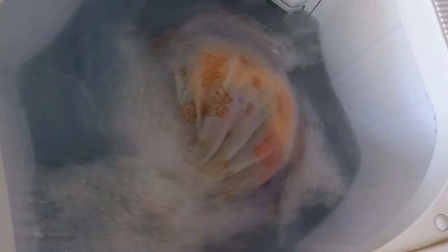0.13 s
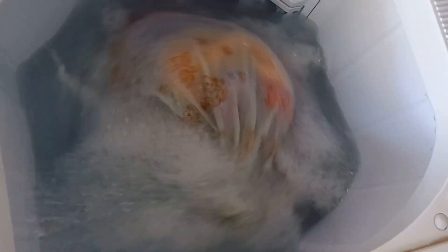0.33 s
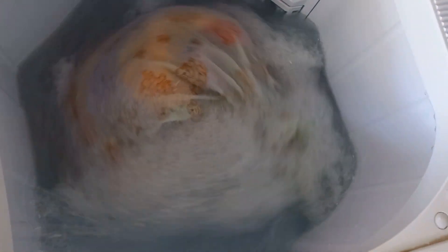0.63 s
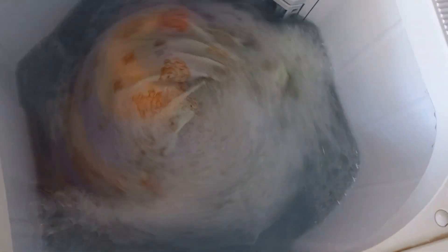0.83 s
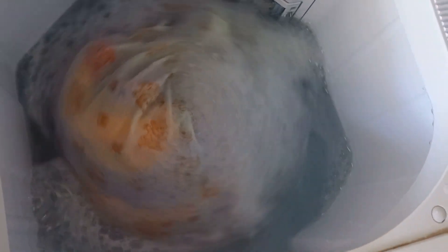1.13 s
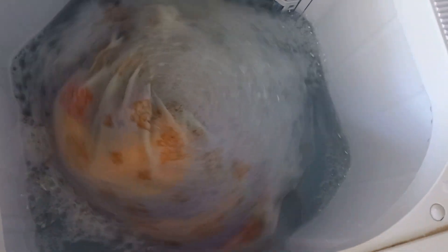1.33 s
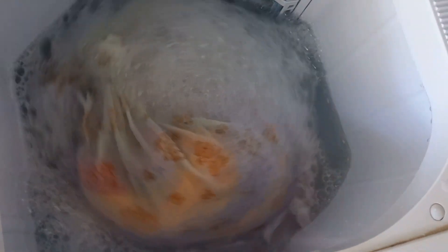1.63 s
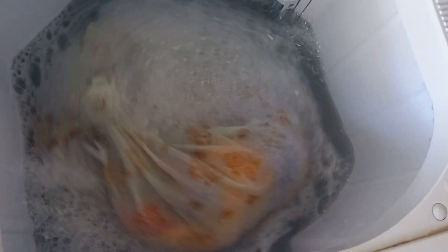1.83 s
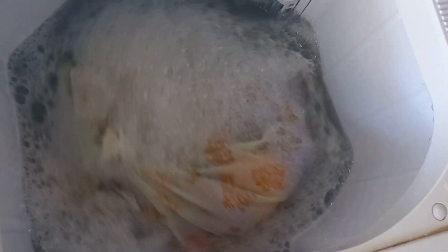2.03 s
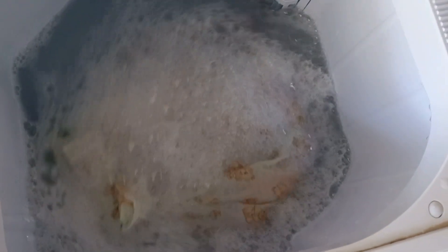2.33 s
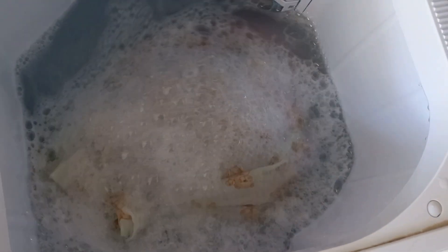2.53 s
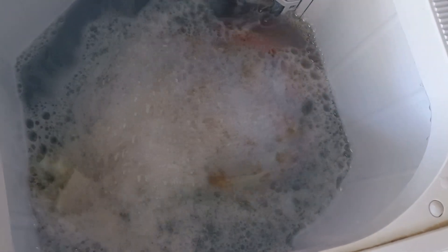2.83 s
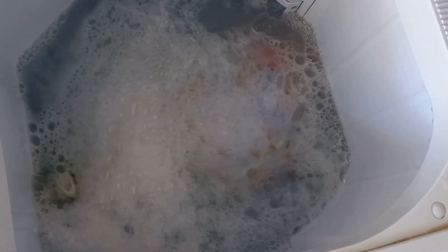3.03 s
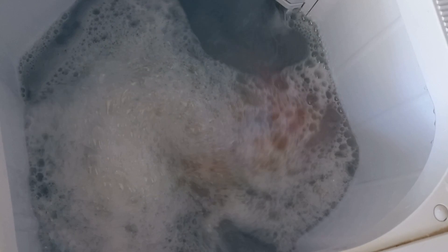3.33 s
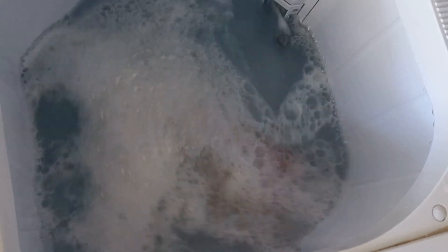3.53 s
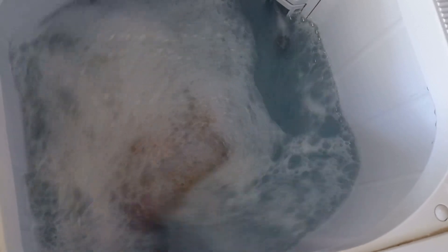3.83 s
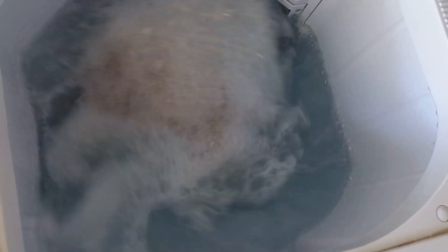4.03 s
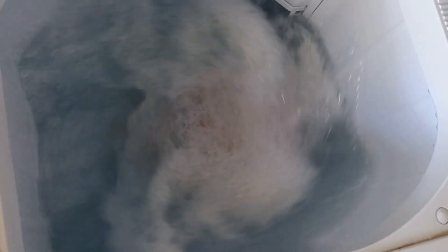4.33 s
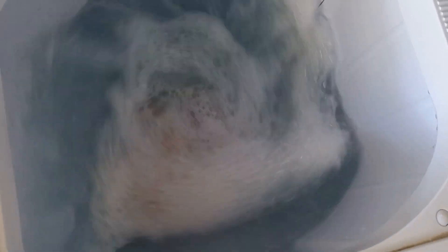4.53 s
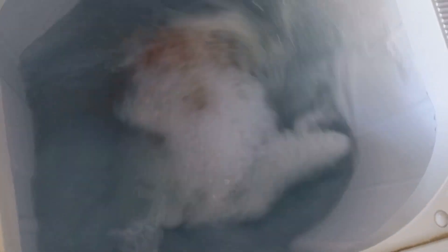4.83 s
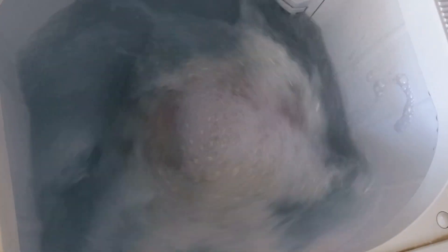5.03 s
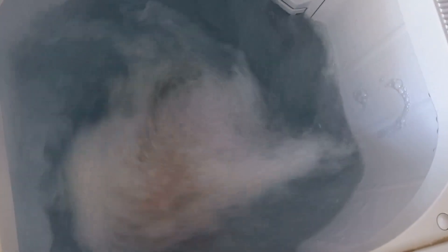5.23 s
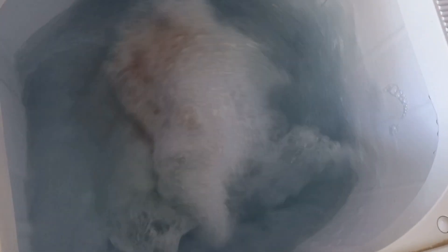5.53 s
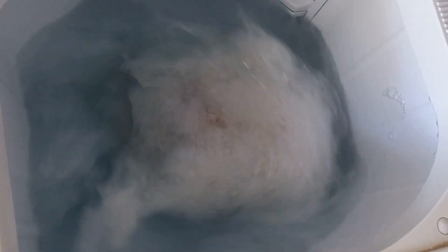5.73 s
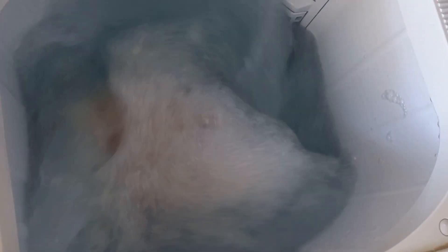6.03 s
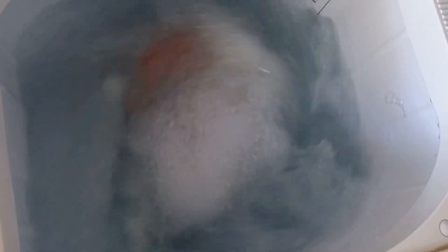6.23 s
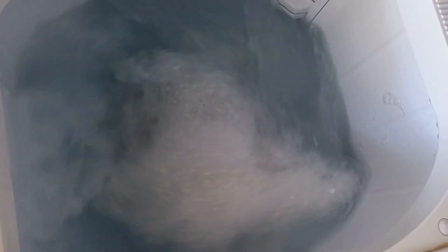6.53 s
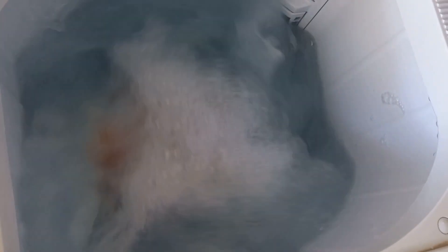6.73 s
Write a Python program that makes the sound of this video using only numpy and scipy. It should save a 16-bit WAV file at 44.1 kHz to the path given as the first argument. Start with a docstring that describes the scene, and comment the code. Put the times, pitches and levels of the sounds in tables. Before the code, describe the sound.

An open top-loading washer ticks quietly, clacks into a steady low motor hum, then soapy water churns and splashes harder until the motor cuts out.

```python
"""Washing machine, lid open

A top-loading washer, with two microphone ports above the tub: soapy water settles over light, fast ticking,
with two soft low gurgles. The drive engages with a clack; the motor hums, belt and gears rumble and hiss.
Low tub modes ring as the load thuds; bubbles and droplets churn and splash ever harder off the tub wall,
with a sharp snap at 3.05 s, perhaps a button on the tub.
The motor runs down near the end and a last wave slaps."""
import sys
import numpy as np
from scipy import signal
from scipy.fft import rfft, irfft, next_fast_len
from scipy.io import wavfile

SR = 44100
rng = np.random.default_rng(int(sys.argv[2]) if len(sys.argv) > 2 else 0)


def generate_wav(sig):
    """Save sig (samples, or channels by samples) to the path in sys.argv[1] as 16-bit PCM at SR."""
    pcm = np.round(np.clip(np.atleast_2d(sig).T, -1, 1) * 32767).astype(np.int16)
    wavfile.write(sys.argv[1], SR, pcm)


N = 303716  # samples
TIME = np.arange(N) / SR  # s
FREQS = np.fft.rfftfreq(next_fast_len(N + 8192), 1 / SR)  # Hz

# All spectra are relative: the noise or swarm they colour is scaled to unit power.
# ticking of a turning part: (time [s], level [dB])
TICKING_LEVEL = [(0, -63.5), (.4, -68.5), (1.3, -67.5), (1.8, -63.5), (2.1, -68.5), (2.8, -65.5),
                 (4, -63.5), (6.89, -57.5)]
# spectrum of the tick's rustle: (frequency [Hz], relative level [dB per Hz])
TICK_SPECTRUM = [(900, 4.5), (1800, -1), (2600, -8), (4500, -3.5), (7500, -6.5), (8800, -12), (10500, -1),
                 (11300, -5), (12400, 8.5), (13200, -6), (14400, -3), (16000, -6.5)]
# modes rung by each tick: (frequency [Hz], relative level [dB], t60 [s])
TICK_MODES = [(533, -4.5, 0.092), (815, 5, 0.052), (1070, -1, 0.07), (1560, -8, 0.089), (2047, 0.5, 0.042),
              (12400, -3, 0.016)]
TICKS_PER_S = 38.2

# low murmur of the resting machine and its water: (time [s], level [dB])
IDLE_LEVEL = [(0, -58), (.4, -59.5), (.52, -64.5), (.8, -61), (.95, -58.5), (1.28, -63), (6.89, -59)]
# spectrum of that murmur: (frequency [Hz], relative level [dB per Hz])
IDLE_SPECTRUM = [(30, -27), (55, -10), (88, 2.5), (120, -5), (190, -10.5), (275, 4), (400, -8.5),
                 (530, -1.5), (650, -11), (800, -5), (950, -15.5), (1800, -22), (4000, -28), (15000, -48)]

# the water calms after the previous stroke: levels at the start and rate of fall
SETTLE_GURGLE_DB, SETTLE_SPRAY_DB, SETTLE_DB_PER_S = -61, -63, 24
# steady churning between the waves: (time [s], gurgle level [dB])
CHURN_LEVEL = [(2.9, -88), (3.5, -76), (3.95, -68.5), (4.05, -58.5), (4.6, -64.5), (5.0, -53.5), (6.2, -54),
               (6.75, -53)]
CHURN_SPRAY_DB = 1  # spray relative to gurgle
# the rocking water breaks on the wall: (time [s], gurgle level [dB], spray level [dB])
WAVES = [(4.14, -55, -77), (4.437, -47, -47), (4.7, -69, -49), (4.82, -54, -53), (4.96, -49, -57),
         (5.135, -42, -42.5), (5.29, -51.5, -59), (5.465, -47, -41.5), (5.67, -58, -42),
         (5.795, -43, -43.5), (5.87, -45, -56), (6.169, -45.5, -39.5), (6.34, -44.5, -45), (6.49, -56, -47),
         (6.64, -50, -48), (6.855, -41.5, -45)]
WAVE_RISE_S, WAVE_FALL_S = 0.04, 0.052
# spectrum of the gurgle: (frequency [Hz], relative level [dB])
GURGLE_SPECTRUM = [(250, 11), (600, -4.5), (1100, -2), (2000, 0.5), (3200, -4), (4500, -2), (8000, -45)]
# spectrum of the spray: (frequency [Hz], relative level [dB per Hz])
SPRAY_SPECTRUM = [(1500, 1), (3000, 3), (4000, 0.5), (5500, -1), (7400, 0.5), (8600, -5), (10500, -4.5),
                  (12500, -6.5), (15500, -7)]

# single splashes, and a sharp snap at 3.05 s, perhaps a button on the tub:
# (time [s], relative bubble level [dB], bubble pitch [Hz], relative spray level [dB])
SPLASHES_AND_SNAP = [(0.089, -40, 3250, -79), (0.1034, -34.5, 3400, -66), (0.518, -50, 2260, -69),
                     (1.813, -45, 3670, -58), (2.292, -35, 1280, -62), (3.054, -39, 5430, -44),
                     (4.023, -36, 2590, -71), (4.208, -38.5, 3110, -68), (4.619, -55, 1640, -45.5),
                     (4.778, -35, 2500, -44), (4.958, -42, 1320, -44.5), (4.983, -32, 2820, -61),
                     (5.103, -33, 7040, -47.5), (5.141, -27.5, 5470, -46), (5.203, -31, 7200, -43.5),
                     (5.437, -30.5, 2420, -52), (5.47, -37, 7260, -40), (5.51, -35.5, 2780, -38.5),
                     (5.59, -33.5, 6280, -48), (5.646, -26.5, 3240, -41), (5.655, -32, 2980, -38.5),
                     (5.767, -28, 1120, -45), (5.795, -29, 6400, -57), (5.869, -36, 7540, -43),
                     (6.002, -38, 7580, -40.5), (6.107, -26, 2110, -45), (6.146, -30, 6540, -41),
                     (6.358, -29, 1340, -41.5), (6.501, -28, 3300, -45), (6.535, -41, 7100, -38.5),
                     (6.563, -54, 4300, -40), (6.613, -33, 7460, -40.5), (6.805, -27.5, 4800, -38.5),
                     (6.824, -29, 1530, -59), (6.836, -28.5, 1140, -46), (6.858, -15, 1165, -35)]
# spectrum of their spray: (frequency [Hz], relative level [dB])
SPLASH_SPECTRUM = [(900, -4), (2700, 0), (4200, -2), (5500, -1), (7400, -5.5), (8600, -6), (11000, -1),
                   (13000, -5), (15500, -10)]
SPLASH_DIRECT = 0.33  # share of their bubbles heard without the wall's echoes
TUB_T60_S, TUB_WET_DB = 0.07, -3  # wall echoes: decay and level relative to the direct sound

# low thuds of the load, and two soft low gurgles of water at the start: (time [s], relative level [dB])
THUDS_AND_LOW_GURGLES = [(0.104, -57), (0.165, -53), (1.479, -30.5), (3.503, -28.5), (3.613, -28),
                         (3.768, -24.5), (4.509, -36), (4.774, -29), (5.477, -34), (6.862, -33.5),
                         (6.876, -34)]
# low modes of the tub: (frequency [Hz], relative level [dB], t60 [s])
TUB_MODES = [(90, 1, 0.11), (141, 5.5, 0.034), (204, -5.5, 0.12), (276, 0, 0.04), (384, 3, 0.054)]

# the drive engages: (time [s], level [dB], decay [s])
CLACKS = [(1.323, -46, 0.04), (1.454, -45.5, 0.016)]
# spectrum of the clacks: (frequency [Hz], relative level [dB per Hz])
CLACK_SPECTRUM = [(100, -7), (220, 8), (370, 11), (600, -13), (1200, -2), (2000, -4), (4000, -13),
                  (8000, -20.5), (15000, -29)]

POWER_ON_S, FULL_LOAD_S, POWER_OFF_S = 1.352, 1.55, 6.66
HUM_HZ, ROTOR_HZ = 120.03, 29.36
# overtones of the magnetic hum: (multiple of twice the mains frequency [-], level [dB])
HUM_ORDERS = [(2, -44), (3, -46), (4, -54.5), (5, -58), (7, -69.5)]
# sidebands from the turning rotor: (hum multiple [-], rotor multiple [-], level [dB])
SIDEBANDS = [(1, -1, -73), (1, 1, -53), (1, 2, -62), (2, 1, -55), (2, 2, -52), (3, 1, -57), (3, 2, -53),
             (4, 2, -57.5)]
HUM_DB, HUM_ATTACK_S, HUM_SAG_DB_PER_S = -28.5, 0.17, 0.22
SLOSH_START_S, SLOSH_CREST_S, SLOSH_PERIOD_S = 3.7, 4.78, 0.344
HUM_SWING_DB, HUM_WAVER_DB = 0.7, 1  # at the slosh period; by chance
# the hum dips briefly: (time [s], depth [dB], half width [s])
HUM_DIPS = [(1.52, 18, 0.017), (3.69, 3, 0.037), (3.815, 9, 0.02), (3.98, 2.5, 0.036), (4.22, 3, 0.046),
            (4.42, 2, 0.067), (4.66, 5, 0.016)]

# load on the belt and gears: (time [s], relative drive level [dB])
DRIVE_LEVEL = [(1.46, -41.5), (1.56, -37), (1.8, -37.5), (1.95, -39.5), (2.8, -39), (3.7, -39.5),
               (4.15, -41.5), (4.9, -38.5), (6.65, -39)]
# cabinet shaken by the drive: (frequency [Hz], relative level [dB per Hz])
RUMBLE_SPECTRUM = [(30, -50), (48, -29), (70, -2), (100, 3.5), (150, 5), (195, -2), (260, 3), (320, 3),
                   (350, 1.5), (430, 1.5), (470, -2), (580, -3.5), (660, -18.5), (1400, -32)]
# belt and gear hiss: (frequency [Hz], relative level [dB per Hz])
WHIRR_SPECTRUM = [(400, 1), (750, 3), (1000, 1), (1300, 3.5), (1600, -0.5), (2600, -1), (3200, -8.5),
                  (4700, -11), (5700, -17.5), (7500, -18), (8500, -24.5), (15500, -28)]
# the belt grips; until then the drive is softer by SLACK_DB
GRIP_S, GRIP_ATTACK_S, SLACK_DB = 1.44, 0.029, -12.5
DRIVE_RELEASE_S = 0.042

RUN_DOWN_DB, RUN_DOWN_DECAY_S, RUN_DOWN_SAG_S, RUN_DOWN_END_HZ = -36, 0.047, 0.07, 80

# how alike the two ports hear noise: (frequency [Hz], likeness [0 to 1])
LIKENESS = [(60, 0.25), (130, 0.89), (290, 0.8), (640, 0.59), (1410, 0.054), (3100, 0.02), (7000, 0)]
# balance of the microphone ports: (frequency [Hz], right minus left [dB])
PORT_BALANCE = [(60, 23), (125, 14.5), (200, 15), (250, 6), (360, 2), (700, 1.5), (1290, -4), (2380, -4),
                (4400, -17), (7000, -26.5), (9000, -15.5), (11500, -11), (15000, -14.5)]
PORT_LAG_S, CUTOFF_HZ = 0.0004, 15950


def from_db(db):
    """Decibels to gain."""
    return 10 ** (np.asarray(db) / 20)


def rms_one(x):
    """Scale to unit power."""
    return x / np.sqrt(np.mean(x ** 2) + 1e-20)


def in_time(rows):
    """Each column of a curve at every sample."""
    s, *columns = np.transpose(rows)
    return [np.interp(TIME, s, c) for c in columns]


def at_hz(points):
    """A spectrum table at every frequency."""
    hz, value = np.transpose(points)
    return np.interp(np.log(FREQS + 1), np.log(hz), value)


def shape(points):
    """Gain per frequency of a spectrum that falls away beyond the ends of its table."""
    below = 1 + (points[0][0] / 2 / (FREQS + 1)) ** 4
    above = 1 + (FREQS / 2 / points[-1][0]) ** 4
    return from_db(at_hz(points)) / np.sqrt(below * above)


def filtered(x, gain):
    """Apply a gain per frequency."""
    size = next_fast_len(N + 8192)
    return irfft(rfft(x, size) * gain, size)[..., :N]


def colour(x, points):
    """Shape x by a spectrum and scale it to unit power."""
    return rms_one(filtered(x, shape(points)))


def noise(points):
    """Stereo noise, alike at both ports in the bass and unrelated in the treble."""
    alike = np.clip(at_hz(LIKENESS), 0, 1)
    mid, side = rng.standard_normal((2, 2 * len(FREQS))).view(complex)
    both = mid * np.sqrt(1 + alike) + side * np.sqrt(1 - alike) * [[1], [-1]]
    return rms_one(irfft(both * shape(points))[:, :N])


def drift(rate):
    """Chance wandering of unit rms, in straight lines between rate random points a second."""
    knots = rng.standard_normal(4096)
    return rms_one(np.interp(TIME * rate, np.arange(len(knots)), knots))


def ring(clicks, hz, t60):
    """A unit click sets a decaying sine of height 1 ringing."""
    r = from_db(-60 / (t60 * SR))
    w = 2 * np.pi * hz / SR
    return signal.lfilter([0, np.sin(w)], [1, -2 * r * np.cos(w), r * r], clicks + 1e-18)


def add(out, s, sound):
    """Mix a short sound in at time s."""
    i = int(np.clip(s * SR, 0, N - 1))
    out[i:i + len(sound)] += sound[:N - i]


def placed(sounds):
    """Stereo mix of (s, sound) pairs, each from its own spot in the tub, so it reaches one port first."""
    left, right = np.zeros(N), np.zeros(N)
    for (s, sound), side in zip(sounds, rng.uniform(-1, 1, 8192)):
        add(left, s + side * PORT_LAG_S, sound * (1 - 0.35 * side))
        add(right, s - side * PORT_LAG_S, sound * (1 + 0.13 * side))
    return np.array([left, right])


def in_tub(x):
    """Dense short echoes off the tub wall, different at each microphone port."""
    t = np.arange(4000) / SR
    echoes = rng.standard_normal((2, len(t))) * from_db(-60 * t / TUB_T60_S) * (t > 0.001)
    echoes *= from_db(TUB_WET_DB) / np.sqrt(np.sum(echoes ** 2, axis=1, keepdims=True))
    return x + signal.fftconvolve(x, echoes, axes=1)[:, :N]


def ticking():
    """Once a turn a brief rustle of contact rings a few modes of the part, each a little differently."""
    db, = in_time(TICKING_LEVEL)
    turns = np.cumsum(TICKS_PER_S * (1 + 0.06 * drift(12))) / SR
    age = (turns % 1) / TICKS_PER_S
    strength = from_db(1.1 * rng.standard_normal(1024))[turns.astype(int)]
    touch = np.exp(-age / 0.007) - np.exp(-age / 0.00069)
    rustle = rms_one((strength * touch + 0.1) * noise(TICK_SPECTRUM))
    clicks = strength * np.diff(np.floor(turns), prepend=0)
    rings = np.zeros(N)
    for hz, level, t60 in TICK_MODES:
        rings += from_db(level) * ring(clicks * rng.uniform(0.5, 1.5, N), hz, t60)
    return from_db(db) * (rustle + rings)


def idle_murmur():
    """The resting machine and its water murmur as low, steady-coloured noise."""
    db, = in_time(IDLE_LEVEL)
    return from_db(db) * noise(IDLE_SPECTRUM)


def water_motion():
    """Gains of gurgle and spray: the old stroke dies away, churning builds, and waves swell and fall on top."""
    churn_db, = in_time(CHURN_LEVEL)
    settle_db = np.array([[SETTLE_GURGLE_DB], [SETTLE_SPRAY_DB]]) - SETTLE_DB_PER_S * TIME
    power = from_db(settle_db) ** 2
    power += from_db([churn_db, churn_db + CHURN_SPRAY_DB]) ** 2
    for s, gurgle_db, spray_db in WAVES:
        swell = np.exp(-np.maximum((s - TIME) / WAVE_RISE_S, (TIME - s) / WAVE_FALL_S))
        power += (from_db([[gurgle_db], [spray_db]]) * swell) ** 2
    return np.sqrt(power)


def bubble(hz, cycles, rise, size=900):
    """A trapped air pocket rings down, its pitch climbing as it nears the surface."""
    turns = np.arange(size) / SR * hz
    age = turns / cycles
    fading = np.exp(-age) - np.exp(-age[-1])
    return fading * np.sin(2 * np.pi * turns * (1 + rise * np.tanh(age / 2)))


def gurgle(rise=0.094, count=5000):
    """Folding water traps swarms of bubbles of many pitches over a soft wash."""
    cycles, size_db = 7, 4.8
    swarm = []
    for when, pitch, size, damping in rng.random((count, 4)):
        loudness = from_db(-size_db * np.log(size + 0.017))  # many faint bubbles, few loud ones
        pocket = bubble(600 + 4400 * pitch ** 1.2, cycles * (0.4 + damping), rise)
        swarm.append((when * N / SR, loudness * pocket))
    folds = from_db(0.74 * drift(45))  # the water folds over in quick, uneven surges
    bubbles = from_db(1.5) * colour(in_tub(placed(swarm)), GURGLE_SPECTRUM)
    wash = from_db(-3.5) * noise(GURGLE_SPECTRUM)
    return folds * (bubbles + wash)


def spray(per_s=2200, size_db=3.5, clump_db=5.5, count=20):
    """Droplets and bursting foam crackle in clumps, each ringing for a few cycles."""
    sizes = from_db(size_db * np.minimum(rng.exponential(1, N), 4)) * rng.choice([-1, 1], N)
    clicks = sizes * (rng.random(N) < per_s * from_db(clump_db * drift(50)) / SR)
    dealt = rng.integers(0, count, N)  # each droplet gets one of the pitches
    drops = []
    for k, hz in enumerate(np.geomspace(2200, 15000, count)):
        drops.append((PORT_LAG_S, hz * ring(clicks * (dealt == k), hz, 30 / hz)))
    fizz = noise(SPRAY_SPECTRUM) * from_db(1.2 * drift(53))
    return colour(in_tub(placed(drops)), SPRAY_SPECTRUM) + from_db(-7) * fizz


def splashes_and_snap(scatter_s=0.014, spray_s=0.007, count=3):
    """Each splash, and the snap, is a crackling noise burst, one main bubble tone and a few smaller ones."""
    plops, burst = [], np.zeros(N)
    t = np.arange(3000) / SR
    ring_s, smaller = 0.002, from_db(-13)
    for s, bubble_db, hz, spray_db in SPLASHES_AND_SNAP:
        height = from_db(bubble_db)
        plops.append((s + 0.000953, height * bubble(hz, hz * ring_s, rise=0.02)))
        for late, pitch in rng.random((count, 2)):
            small = bubble(hz * 2 ** (pitch - 0.5), hz * ring_s, rise=0.062)
            plops.append((s + scatter_s * late, height * smaller * small))
        add(burst, s, from_db(spray_db + 7) * np.exp(-t / spray_s))
    crackle = rms_one(from_db(4 * drift(900)))
    direct = placed(plops)
    bubbles = SPLASH_DIRECT * direct + (1 - SPLASH_DIRECT) * in_tub(direct)
    return bubbles + burst * crackle * noise(SPLASH_SPECTRUM)


def thuds_and_low_gurgles():
    """Soft pushes, first by two low gurgles of water and later by the load, set low tub modes ringing."""
    push = np.zeros(N)
    for s, db in THUDS_AND_LOW_GURGLES:
        add(push, s, from_db(db) * np.hanning(64) / 32)
    body = np.zeros(N)
    for k, (hz, db, t60) in enumerate(TUB_MODES):
        body += (-1) ** k * from_db(db) * ring(push, hz, t60)
    return signal.sosfilt(signal.butter(3, 65, "high", fs=SR, output="sos"), body)


def clacks():
    """The clutch and belt take up their slack with a short rattle of decaying noise."""
    shake = np.zeros(N)
    for s, db, decay in CLACKS:
        shake += from_db(db) * (TIME > s) * np.exp(-np.abs(TIME - s) / decay)
    return shake * noise(CLACK_SPECTRUM)


def running(on_s, off_s):
    """1 while the motor turns, with short ramps."""
    return np.clip(np.minimum(TIME - on_s, off_s - TIME) / 0.028, 0, 1)


def hum_level():
    """The hum swells, then sags slowly; once the water rocks, it swings at the slosh period."""
    rocking = np.clip((TIME - SLOSH_START_S) / SLOSH_PERIOD_S, 0, 1)
    swing = rocking * np.cos(2 * np.pi * (TIME - SLOSH_CREST_S) / SLOSH_PERIOD_S)
    dips = sum(depth * np.exp(-((TIME - s) / width) ** 2) for s, depth, width in HUM_DIPS)
    db = HUM_DB - HUM_SAG_DB_PER_S * (TIME - POWER_ON_S)
    db = db + HUM_SWING_DB * swing + HUM_WAVER_DB * drift(11) - dips
    return from_db(db) * np.clip((TIME - POWER_ON_S) / HUM_ATTACK_S, 0.1, 1) ** 1.16


def motor_hum():
    """The stator hums at twice the mains frequency; load adds overtones and the slipping rotor's sidebands."""
    phase = 2 * np.pi * HUM_HZ * TIME + 0.098 * drift(15)
    rotor = 2 * np.pi * np.cumsum(ROTOR_HZ + 0.1 * drift(3.05)) / SR
    buzz = np.zeros(N)
    for k, db in HUM_ORDERS:
        angle = round(k) * phase + rng.uniform(0, 2 * np.pi)
        buzz += from_db(db + 1.6 * drift(7.1)) * np.sin(angle)
    for k, turns, db in SIDEBANDS:
        angle = round(k) * phase + round(turns) * rotor + rng.uniform(0, 2 * np.pi)
        buzz += from_db(db + 2 * drift(5.5)) * np.sin(angle)
    load = np.clip((TIME - POWER_ON_S) / (FULL_LOAD_S - POWER_ON_S), 0, 1) ** 2
    hum = hum_level() * np.sin(phase) + load * buzz
    return np.sqrt(2) * hum * running(POWER_ON_S, POWER_OFF_S)  # sine levels are rms


def drive():
    """Belt and gears rumble in the cabinet and hiss, pulsing with the motor's torque and twice a rotor turn."""
    load_db, = in_time(DRIVE_LEVEL)
    drive_db = load_db + SLACK_DB * np.clip(1 - (TIME - GRIP_S) / GRIP_ATTACK_S, 0, 1)
    torque = np.sin(2 * np.pi * HUM_HZ * TIME)
    wobble = np.sin(2 * np.pi * 2 * ROTOR_HZ * TIME)
    rumble = from_db(drive_db - 2.5) * noise(RUMBLE_SPECTRUM) * (1 + 0.022 * torque + 0.1 * wobble)
    whirr = from_db(drive_db - 11.5) * noise(WHIRR_SPECTRUM) * (1 + 0.074 * torque + 0.046 * wobble)
    whirr = whirr * from_db(1.07 * drift(40))
    release = np.exp(-np.maximum(TIME - POWER_OFF_S, 0) / DRIVE_RELEASE_S)
    return (rumble + whirr) * (TIME > POWER_ON_S) * release


def run_down():
    """As the power goes off, a hum takes over that sinks in pitch and dies."""
    age = np.maximum(TIME - POWER_OFF_S, 0)
    hz = RUN_DOWN_END_HZ + (HUM_HZ - RUN_DOWN_END_HZ) * np.exp(-age / RUN_DOWN_SAG_S)
    takes_over = (TIME > FULL_LOAD_S) * (1 - running(POWER_ON_S, POWER_OFF_S))
    level = np.sqrt(2) * from_db(RUN_DOWN_DB) * takes_over * np.exp(-age / RUN_DOWN_DECAY_S)
    return level * np.sin(2 * np.pi * np.cumsum(hz) / SR)


def scene():
    """Machine and water together."""
    machine = ticking() + idle_murmur() + clacks() + motor_hum() + drive() + run_down()
    gurgle_gain, spray_gain = water_motion()
    water = gurgle_gain * gurgle() + spray_gain * spray()
    return machine + water + splashes_and_snap() + thuds_and_low_gurgles()


def record(dry):
    """The right microphone port favours the bass and the left the treble; the top is cut."""
    ratio = from_db(at_hz(PORT_BALANCE))
    ports = np.array([2 / (1 + ratio), 2 * ratio / (1 + ratio)])
    low_pass = 1 / np.sqrt(1 + (FREQS / CUTOFF_HZ) ** 240)
    return filtered(dry, ports * low_pass)


dry = scene()
out = record(dry)
generate_wav(out)
```